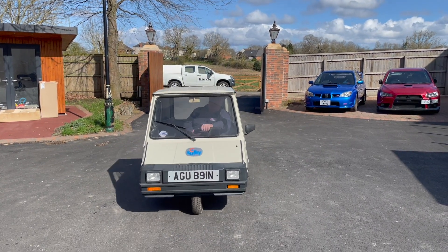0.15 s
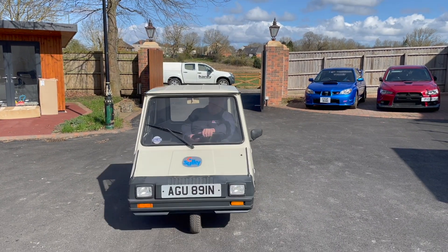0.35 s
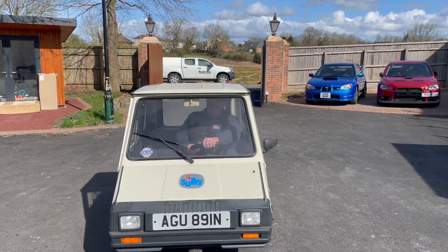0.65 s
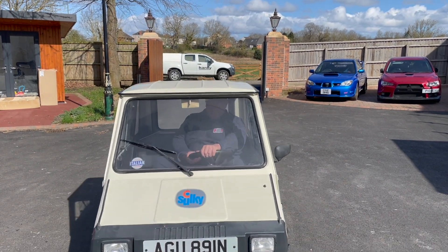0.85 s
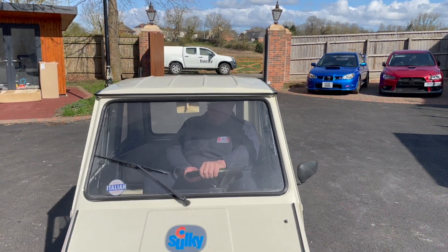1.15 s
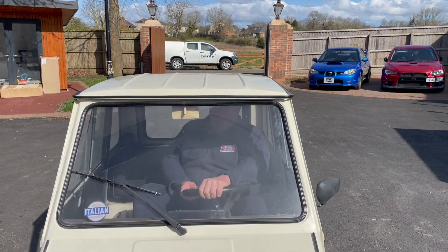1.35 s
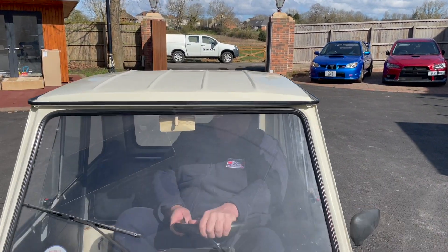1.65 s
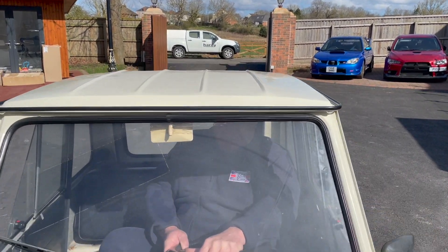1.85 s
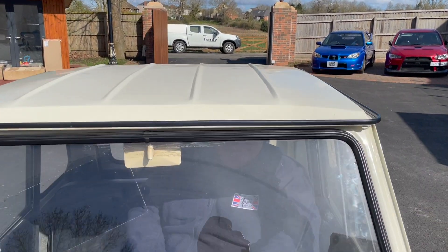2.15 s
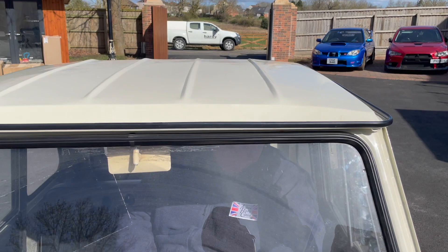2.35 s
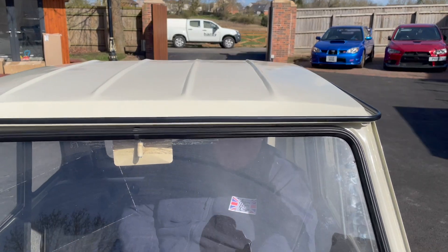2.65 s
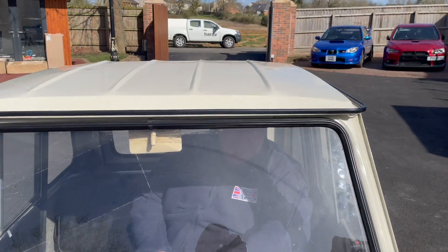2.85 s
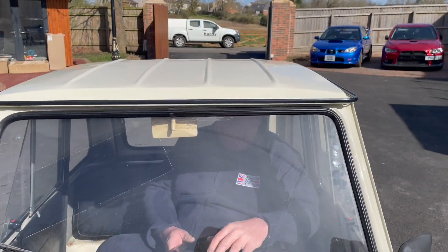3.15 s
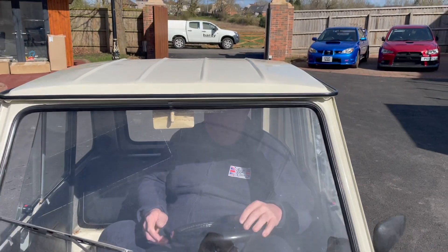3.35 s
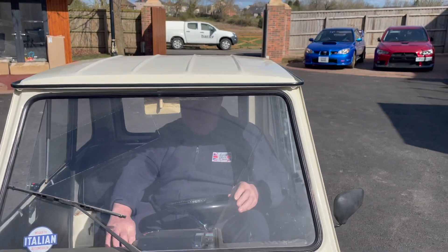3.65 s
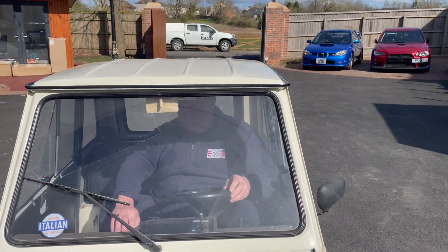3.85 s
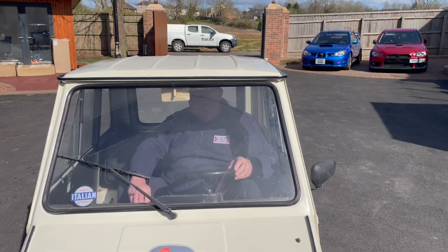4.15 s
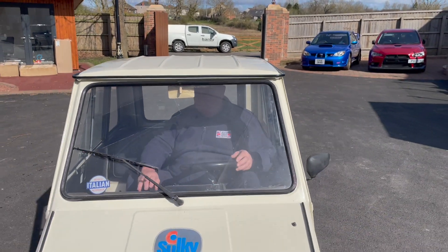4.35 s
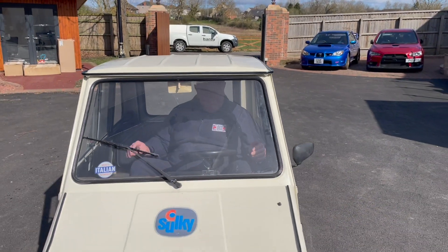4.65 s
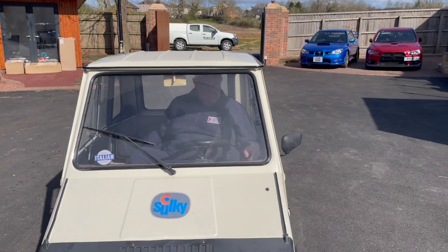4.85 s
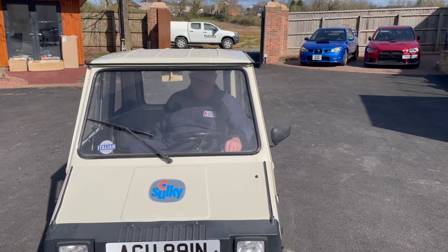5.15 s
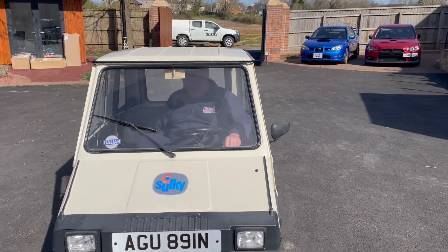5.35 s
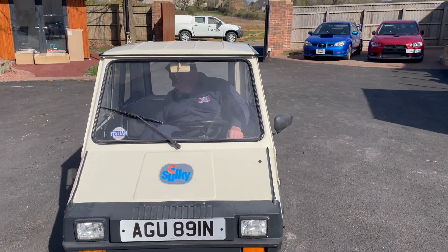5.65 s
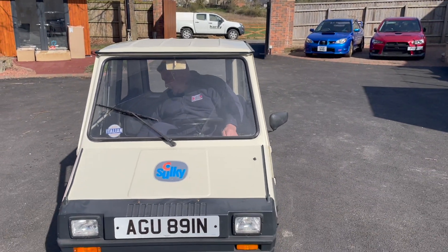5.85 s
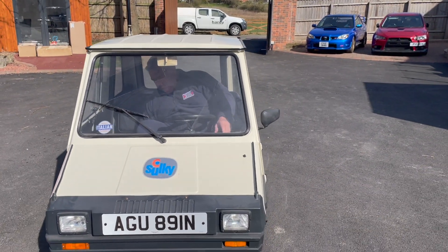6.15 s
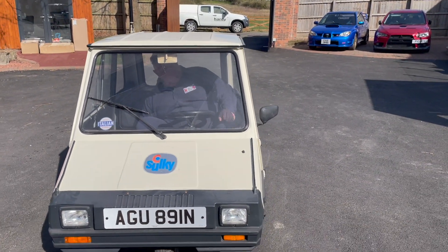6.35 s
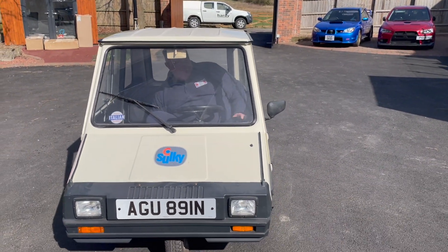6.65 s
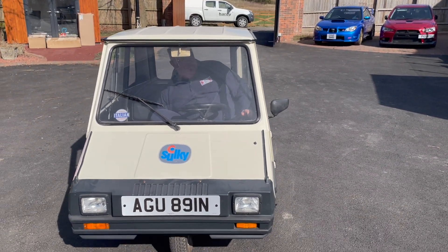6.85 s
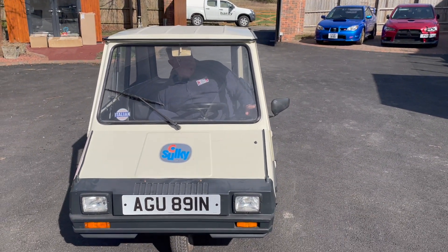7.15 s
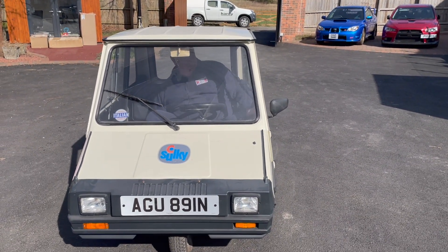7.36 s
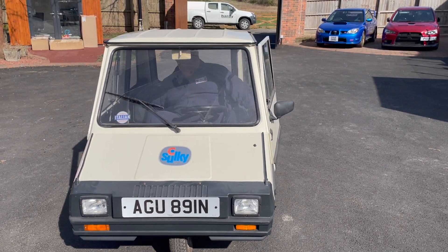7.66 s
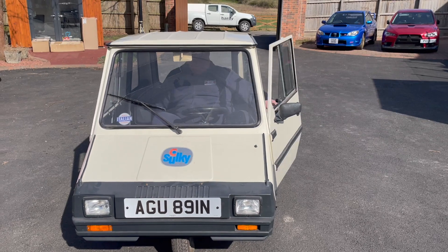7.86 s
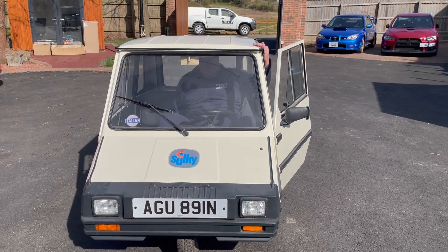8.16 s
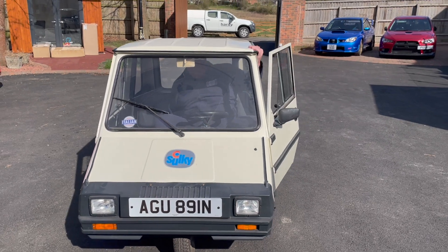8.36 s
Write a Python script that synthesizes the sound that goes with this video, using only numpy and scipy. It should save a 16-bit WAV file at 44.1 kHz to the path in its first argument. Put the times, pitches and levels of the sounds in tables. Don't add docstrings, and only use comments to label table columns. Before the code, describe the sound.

A tiny two-stroke engine buzzes closer, drops to a lumpy idle, crunches into gear, cuts out, then handbrake clicks and a door latch clacks.

```python
import sys
import numpy as np
from scipy import signal
from scipy.fft import rfft, irfft, next_fast_len
from scipy.io import wavfile
from scipy.ndimage import uniform_filter1d, map_coordinates

SR = 44100
rng = np.random.default_rng(int(sys.argv[2]) if len(sys.argv) > 2 else 0)


def rack_gain(trim_db):
    fader = np.asarray(trim_db, float)
    return 10 ** (fader / 20)


def pcm_store(signal):
    levels = np.round(np.clip(np.atleast_2d(signal), -1, 1) * 32767)
    wavfile.write(sys.argv[1], SR, levels.astype(np.int16).T)


N = 374850
T = np.arange(N) / SR
STEP = 64


def unit(x):
    return x / np.sqrt(np.mean(x ** 2) + 1e-20)


def steady(x):
    power = uniform_filter1d(uniform_filter1d(x ** 2, SR // 3), SR // 4)
    return x / np.sqrt(np.abs(power) + 1e-3 * np.mean(x ** 2))


def along(points, hz):
    f, v = np.transpose(points)
    return np.interp(np.log(hz + 1), np.log(f + 1), v)


def curves(rows, before=-120, after=-120):
    s, *cols = np.transpose(rows)
    return [np.interp(T, s, c, before, after) for c in cols]


def swells(rows, edge):
    start, end, *cols = np.transpose(rows)
    at = (T[::STEP] - start[:, None]) / (end - start)[:, None]
    ramp = np.minimum(at, 1 - at) / np.clip(edge, .02, .5)
    shape = np.sin(np.pi / 2 * np.clip(ramp, 0, 1))
    return [np.interp(T, T[::STEP], np.sqrt(rack_gain(2 * db) @ shape ** 2)) for db in cols]


def wobble(rate):
    knots = rng.standard_normal(int(N * rate / SR) + 4)
    coarse = map_coordinates(knots, [T[::STEP] * rate])
    return np.interp(T, T[::STEP], coarse)


def filtered(x, response):
    m = next_fast_len(N + SR // 4, real=True)
    return irfft(rfft(x, m) * response(np.fft.rfftfreq(m, 1 / SR)), m)[..., :N]


def modes(table):
    def response(f):
        return sum((-1) ** k * rack_gain(db) * 1j * f * width / (c * c - f * f + 1j * f * width)
                   for k, (c, width, db) in enumerate(table))
    return response


def fickle(x, table, depth_db, rate):
    ringing = filtered(x, lambda f: np.array([modes([mode])(f) for mode in table]))
    signs = (-1) ** np.arange(len(table))
    return unit(sum(sign * rack_gain(depth_db * wobble(rate)) * y for sign, y in zip(signs, ringing)))


def noise(spectrum):
    return unit(filtered(rng.standard_normal(N), lambda hz: rack_gain(along(spectrum, hz))))


def excited(table):
    return steady(filtered(rng.standard_normal(N), lambda f: modes(table)(f) ** 2))


def spikes(times, sizes):
    return np.bincount(np.clip(np.round(times * SR).astype(int), 0, N - 1), sizes, N)


def bursts(train, t60, rise, hold=0):
    t = T[:SR // 3]
    shape = rack_gain(-60 * np.maximum(t - hold, 0) / t60) * (1 - np.exp(-t / rise))
    return signal.fftconvolve(train, shape)[:N]


def contacts(events, rings, scatter, ring_db):
    out, t = np.zeros(N + SR), T[:SR // 2]
    spray = np.tile(noise(scatter), 2)
    for s, db, thud_db, t60 in events:
        i = round(s * SR)
        damping = rack_gain(-60 * t / np.abs(t60))
        ring = 0
        for hz, level, long in rings:
            strength = rack_gain(level + rng.normal(0, 1.2) - 60 * t / long)
            waver = 3.0 * np.sin(rng.uniform(63, 274) * t)
            ring = ring + strength * np.sin(2 * np.pi * hz * t + waver)
        fall = damping + .18 * np.sqrt(damping) + 1.7 * rack_gain(-60 * t / .025)
        fall = fall * (1 - np.exp(-t / .0028))
        thud = rack_gain(thud_db + ring_db) * ring * np.sqrt(damping) * (1 - np.exp(-t / 0.028))
        out[i:][:len(t)] += thud + rack_gain(db - 6.5) * fall * spray[i:][:len(t)]
    return out[:N]


# first t/s, last t/s, spacing/turns
FIRING_RUNS = [(.0085, .1096, 8), (.2065, .3077, 8), (.394, .7068, 8), (.81, 1.1394, 8), (1.2261, 1.342, 8),
               (1.4477, 1.6676, 7), (1.7628, 1.862, 6), (1.9663, 1.9663, 1), (2.0876, 2.1464, 2),
               (2.237, 2.3794, 2), (2.4454, 2.6768, 2), (2.7585, 2.9203, 2), (3.0852, 3.1701, 1),
               (3.254, 3.3797, 3), (3.7116, 3.7983, 2), (3.962, 4.0469, 2), (4.199, 4.3458, 2),
               (4.4548, 4.6497, 2), (4.7128, 4.9007, 2), (4.996, 5.0564, 2), (5.1507, 5.3341, 2),
               (5.425, 5.7262, 2), (6.1952, 6.261, 1), (6.3375, 6.4448, 1), (6.618, 6.618, 1)]
# blow level/dB, exhaust pop level/dB
RUN_FORCE = [(-26.5, -48), (-23, -47), (-21.5, -5.5), (-23, -24), (-22, -21.5), (-23, -14.5), (-20, -10.5),
             (-24.5, -26), (-34, -31), (-32, -31.5), (-30, -36), (-31, -32), (-60, -48), (-44, -56),
             (-28, -41), (-29, -64), (-41, -32), (-19, -18), (-22.5, -20.5), (-31, -19), (-23.5, -21),
             (-22.5, -21.5), (-39, -30), (-32, -19.5), (-36, -42)]
FIRE_SCATTER_DB, POP_SCATTER_DB = 1.5, 1.3


def firings(angle):
    rows = []
    for (first, last, every), (blow_db, pop_db) in zip(FIRING_RUNS, RUN_FORCE):
        ends = np.interp([first, last], T, angle)
        count = round((ends[1] - ends[0]) / every) + 1
        times = np.interp(np.linspace(*ends, count), angle, T)
        times[-1] = last
        rows += [(s, blow_db, pop_db) for s in times]
    s, blow_db, pop_db = np.transpose(rows)
    chance = rng.standard_normal((len(s), 2))
    return s, blow_db + FIRE_SCATTER_DB * chance[:, 0], pop_db + POP_SCATTER_DB * chance[:, 1]


# f/Hz, width/Hz, level/dB
CASING_FAR = [(650, 68, 7.5), (852, 80, 10), (1384, 170, 2.5), (2040, 99, -1), (2580, 180, -9.5),
              (3060, 120, -11), (3520, 140, -7)]
CASING_NEARING = [(904, 77, 8.5), (1320, 210, -2.5), (1790, 98, 0), (2100, 68, 0.5), (2570, 290, -6.5),
                  (3320, 460, -18)]
CASING_IDLING = [(1510, 170, -7), (1766, 55, -1.5), (2160, 130, -4.5), (2760, 200, -5.5), (3090, 270, -8.5),
                 (3455, 310, -12.5), (4840, 470, -25)]
CASING_IN_GEAR = [(1340, 87, -0.5), (1714, 91, 3), (2220, 150, -3), (2745, 190, -6), (3260, 270, -4.5),
                  (5100, 660, -14.5)]
IN_GEAR_S = 4.035


def casing_knock(rattle, blows, speed, close):
    in_gear = np.clip((T - IN_GEAR_S) / .2, 0, 1)
    struck = unit(rattle) + 0.45 * blows
    idling = fickle(struck, CASING_IDLING, depth_db=1.5, rate=9)
    loaded = fickle(struck, CASING_IN_GEAR, depth_db=1.5, rate=9)
    nearing = np.clip((78 - speed) / 4, 0, 1)
    shaken = unit(rattle) + 0.15 * blows
    distant = fickle(shaken, CASING_FAR, depth_db=1.8, rate=9)
    approach = fickle(shaken, CASING_NEARING, depth_db=1.5, rate=5.53)
    here = (1 - in_gear) * idling + in_gear * loaded
    away = (1 - nearing) * distant + nearing * approach
    return np.clip(speed / 9, 0, 1) * steady(close * here + (1 - close) * away)


# f/Hz, width/Hz, level/dB
BORE = [(1080, 175, 0)]
# start t/s, end t/s, level over its usual slap/dB
LOOSE = [
    (1.72, 2.12, -22),
    (2.75, 3.6, 0.5),
    (4.9, 5.7, -10.5),
]


def piston_slap(top, bottom, fire, rattle, speed):
    bore = lambda f: modes(BORE)(f) ** 2
    hits = unit(filtered(top + .8 * bottom + .6 * fire, bore))
    slap = hits + .45 * unit(filtered(rattle, bore))
    return np.clip((63 - speed) / 4, 0, 1) * (1 + swells(LOOSE, edge=0.53)[0]) * steady(slap)


# f/Hz, level/dB per Hz
FINS = [(700, -22), (1130, 9), (1410, 6.5), (2350, -15.5), (4100, -23.5), (5000, -21), (6090, -25.5),
        (7250, -21.5), (8010, -16), (10300, -35), (12700, -31), (13900, -36)]
LEAK_DB, LEAK_T60_S = -2, 0.53


def fin_hiss(top, bottom, fire, near, close, busy):
    far_burn = bursts(fire, t60=.1, rise=.004, hold=.016)
    near_burn = bursts(fire, t60=.06, rise=.003, hold=.007)
    strokes = bursts(2.0 * top + 0.14 * bottom, t60=0.043, rise=0.013)
    ring = (0.044 + 2.4 * close) * strokes + (1 - near) * far_burn + near * near_burn + 0.32 * busy
    ring = ring + rack_gain(LEAK_DB) * (1 - busy) * bursts(top, t60=LEAK_T60_S, rise=.01)
    treble = lambda f: 1 / (1 + (2200 / (f + 1)) ** 4)
    return rack_gain(2.5 - 3.83 * close) * steady(ring * filtered(noise(FINS), treble))


# f/Hz, width/Hz, level/dB
PIPE = [(302, 74, 0), (219, 38, -6), (485, 15, -1)]


def exhaust_pipe(puff, pop, busy):
    def soft(f):
        swing = np.exp(-((f - 410) / 150) ** 2)
        return swing + 1.0 * modes(PIPE)(f) / (1 + (f / 600) ** 4)
    gas = (bursts(puff + pop, t60=0.018, rise=0.003) + 0.33 * busy) * rng.standard_normal(N)
    pipe = unit(filtered(puff + pop, soft)) + .16 * unit(filtered(gas, soft))
    return busy * steady(pipe)


# f/Hz, width/Hz, level/dB
SILENCER = [(59.6, 14.5, 1), (111, 219, -18), (139.4, 20, -4.5)]


def silencer_thump(puff, pop, near, busy):
    return near * busy * steady(filtered(puff + .4 * pop, modes(SILENCER)))


# f/Hz, level/dB per Hz
PANELS = [(13, -21), (22, 7.5), (64, 3), (156, 0), (237, -7), (395, -4.5), (583, -14), (900, -24),
          (1170, -45), (1980, -120)]


def panel_rumble(near, busy):
    return rack_gain(-7.3 - 3.2 * (1 - near) + 1.6 * wobble(14)) * busy ** 2 * noise(PANELS)


# start t/s, end t/s, level/dB
FIRST = [(-.05, .12, -26), (.15, .36, -15), (.38, .67, -18), (.7, 1.18, -17.5), (1.08, 1.42, -19.5),
         (1.36, 1.69, -15.5), (1.78, 1.86, -27), (1.98, 2.24, -26)]
SECOND = [(-.1, .27, -20.5), (.24, .54, -20.5), (.71, 1.02, -24), (.95, 1.45, -20.5), (1.2, 1.46, -24),
          (1.47, 1.72, -19), (1.86, 2.06, -19), (2.13, 2.18, -26)]
THIRD = [(-.1, .3, -33.5), (.3, 1.3, -38), (1.25, 1.7, -29.5)]
FOURTH = [(-.1, 0.28, -32), (0.324, 0.857, -30), (0.795, 1.472, -31), (1.47, 1.753, -33.5)]
FIFTH = [(0.247, 0.476, -30), (0.46, 0.83, -28), (0.77, 1.25, -35), (1.214, 1.7, -36)]
UPPER_DB = -34


def exhaust_note(angle, near):
    first, second = swells(FIRST, edge=.35)[0], swells(SECOND, edge=.25)[0]
    cycle = 2 * np.pi * angle + .35 * wobble(10)
    upper = 0
    for order in range(6, 11):
        level = rack_gain(UPPER_DB - 7.5 - .8 * max(order - 5, 0) + 3 * wobble(2.9))
        upper = upper + level * np.sin(order * cycle + order ** 2)
    for order, rows in enumerate([THIRD, FOURTH, FIFTH], start=3):
        upper = upper + rack_gain(3) * swells(rows, edge=.3)[0] * np.sin(order * cycle + order ** 2)
    note = rack_gain(1.2) * first * np.sin(cycle) + rack_gain(.2) * second * np.sin(2 * cycle + 0.67)
    note = note + upper * (1 - near)
    return note * np.clip((2.3 - T) / 0.037, 0, 1)


# t/s, speed/(turns/s)
CRANK = [(0.0, 86.41), (0.65, 77.12), (1.64, 64.28), (2.03, 44.96), (2.13, 33.73), (2.33, 28.8),
         (2.55, 25.92), (3.0, 24.0), (3.93, 23.88), (4.75, 32.07), (5.13, 32.23), (5.36, 33.09),
         (5.72, 33.46), (5.91, 27.7), (6.37, 10.06), (6.5, 6.49), (6.66, 2.98), (6.7, 0.0)]
# t/s, exhaust effort level/dB, loss of knock and hiss from bonnet and screen in the way/dB
ENGINE = [(0, -29.5, -0.5), (.3, -34, -3), (.9, -29.5, 0.5), (1.3, -31, 0), (1.7, -27.5, 5),
          (1.96, -23, 14), (2.24, -30.5, 8.5), (2.55, -33, 3.5), (3.08, -33, 1.5), (3.4, -34.5, -2.5),
          (3.9, -32, -4.5), (4.2, -29.5, -2), (5.0, -29, 2), (5.7, -27.5, 3.5), (5.85, -35.5, -2),
          (6.2, -30.5, 1), (6.45, -36, -3), (6.75, -51, -28)]
# start t/s, end t/s, level of the share taken off/dB
COASTING = [
    (2.05, 2.98, -4.5),
]
# at idle/dB, per dB of speed, per dB of shading, per dB of effort
KNOCK_LAW = (-40.5, 0.68, -0.47, 0.31)
HISS_LAW = (-44, 0.77, -0.9, 0.93)
RUMBLE_LAW = (-23.5, 1.1567, 0.06, 0.04)
SLAP_LAW = (-42.5, 0.15, 0.12, 0.39)
IDLE_TURNS_PER_S, IDLE_EFFORT_DB = 30, -32


def engine():
    speed = curves(CRANK, before=0, after=0)[0]
    angle = np.cumsum(speed) / SR
    turn = np.arange(1, angle[-1])
    chance = rng.standard_normal((len(turn), 4))
    when = lambda turns: np.interp(turns, angle, T)
    pipe_db, shade_db = curves(ENGINE, after=-54)
    speed_db = 20 * np.log10(np.maximum(speed, 4) / IDLE_TURNS_PER_S)

    def level(law):
        return law[0] + law[1] * speed_db + law[2] * shade_db + law[3] * (pipe_db - IDLE_EFFORT_DB)
    hiss_db, rumble_db = level(HISS_LAW), level(RUMBLE_LAW)
    fire_s, blow_db, pop_db = firings(angle)
    at_fire = lambda db: np.interp(fire_s, T, db)

    softer = np.interp(when(turn), T, swells(COASTING, edge=.15)[0])
    top = spikes(when(turn), rack_gain(1.1 * chance[:, 0]) * (1 - softer))
    bottom = spikes(when(turn + .52), rack_gain(-12 + 2.5 * chance[:, 1]))
    fire = spikes(fire_s, rack_gain(blow_db - at_fire(hiss_db) - 16.5))
    puff = spikes(when(turn + .31 + .003 * chance[:, 2]), rack_gain(.7 * chance[:, 3]))
    fire_turn = np.round(np.interp(fire_s, T, angle))
    pop = spikes(when(fire_turn + 0.3075), rack_gain(pop_db - at_fire(pipe_db) - 5.0))

    busy = np.clip(speed / 24, 0, 1)
    near = np.clip((64 - speed) / 12, 0, 1)
    close = np.clip((66 - speed) / 24, 0, 1)
    shaking = bursts(top + bottom + .55 * fire, t60=.032, rise=.002)
    shaking = shaking + .12 * bursts(fire, t60=.09, rise=.004) + .045 * busy
    rattle = shaking * rng.standard_normal(N)
    blows = unit(top + bottom + 0.77 * fire)

    sound = rack_gain(level(KNOCK_LAW) + 1.1) * casing_knock(rattle, blows, speed, close)
    sound = sound + rack_gain(level(SLAP_LAW) - 0.5) * piston_slap(top, bottom, fire, rattle, speed)
    sound = sound + rack_gain(hiss_db) * fin_hiss(top, bottom, fire, near, close, busy)
    sound = sound + rack_gain(pipe_db - 2.5) * exhaust_pipe(puff, pop, busy)
    sound = sound + rack_gain(rumble_db - 5.2) * silencer_thump(puff, pop, near, busy)
    sound = sound + rack_gain(rumble_db) * panel_rumble(near, busy)
    stopped = np.clip((6.745 - T) / .09, 0, 1)
    return sound * stopped + exhaust_note(angle, near)


# f/Hz, time to fall 60 dB/s
WALLS = [(100, 0.99), (1000, 0.26), (4000, 0.017), (14000, 0.033)]
# f/Hz, level/dB
WET = [(60, -6), (500, -10), (1500, -8), (3000, -1.5), (6300, -2), (7400, -22), (8900, -22), (9700, -7),
       (11000, -13), (12800, -9), (13700, -30)]
# f/Hz, likeness (1 = the same)
ALIKE = [(60, .45), (400, .6), (1500, .04), (12000, .02)]


def yard(x):
    hz, t, z = signal.stft(rng.standard_normal((2, SR // 2)), SR, nperseg=256)
    turn = np.arccos(np.clip(along(ALIKE, hz), -1, 1))[:, None] / 2
    z = np.cos(turn) * z[0] + np.sin(turn) * np.array([z[1], -z[1]])
    t60 = along(WALLS, hz)[:, None]
    tail = signal.istft(z * rack_gain(-60 * t / t60) / np.sqrt(t60), SR, nperseg=256)[1]
    late = np.pad(x, (400, 0))[:N]
    wet = filtered(late, lambda f: rack_gain(along(WET, f)))
    return signal.fftconvolve(wet[None], tail / np.linalg.norm(tail[0]), axes=1)[:, :N]


# f/Hz, level/dB per Hz
TRAFFIC_HUM = [(18, -16), (30, 2.5), (434, -11.5), (506, -10.5), (560, -12), (803, -6.5), (1270, -16),
               (1870, -23), (2190, -29.5), (6500, -48), (13900, -59)]
TRAFFIC_DB = -43.5


def traffic():
    drift_db = .9 * wobble(2.5) + .5 * wobble(7.5)
    apart = np.array([noise(TRAFFIC_HUM), noise(TRAFFIC_HUM)])
    return rack_gain(TRAFFIC_DB + drift_db) * (noise(TRAFFIC_HUM) + apart)


# start t/s, end t/s, springs level/dB, panels level/dB
ROCKING = [(2.66, 2.8, -25.5, -41), (3.57, 3.69, -40, -32), (5.0, 5.8, -31, -61), (5.95, 6.24, -27, -43),
           (6.25, 6.34, -26.5, -38), (6.36, 6.42, -26, -37.5), (6.43, 6.49, -21, -32),
           (6.49, 6.6, -21, -57), (6.66, 6.82, -17.5, -33.5), (6.8, 6.95, -22.5, -37.5),
           (6.88, 6.99, -21, -28.5), (6.97, 7.1, -22, -32), (7.05, 7.27, -30, -36.5),
           (7.31, 7.6, -35.5, -44.5), (7.64, 7.74, -32, -39), (7.78, 7.87, -34.5, -38),
           (7.86, 8.0, -48.5, -51), (8.15, 8.4, -41.5, -48)]
# f/Hz, width/Hz, level/dB
SPRINGS = [(53.6, 18.3, -4.5), (83, 31.2, -3), (115.8, 58, -6.5)]
SHELL = [(154, 77, 0.5), (255.5, 91, 2.5), (339, 157, -2)]
JOLT_DB, JOLT_T60_S = -3, 0.35


def rocking():
    springs, panels = swells(ROCKING, edge=0.23)
    s, db = np.transpose(BRAKE)[:2]
    panels = panels + bursts(spikes(s, rack_gain(db + JOLT_DB)), t60=JOLT_T60_S, rise=0.0023)
    return springs * excited(SPRINGS) + panels * excited(SHELL)


# start t/s, end t/s, level/dB
CRUNCH = [
    (4.035, 4.15, -30),
    (4.1, 4.3, -37.5),
]
# f/Hz, level/dB per Hz
COGS = [(290, -25), (500, -19), (700, -7), (1500, -12.5), (3500, -23), (5040, -29), (7330, -46),
        (12000, -45), (19800, -120)]


def gearbox():
    teeth = spikes(rng.uniform(4, 4.3, 70), rack_gain(0.84 * rng.standard_normal(70)))
    chatter = bursts(teeth, t60=0.094, rise=0.0033) * noise(COGS)
    return swells(CRUNCH, edge=0.48)[0] * steady(chatter)


# t/s, ring level/dB, hiss level/dB
LONE_KNOCK = (5.1, 13, -39)
# f/Hz, width/Hz, level/dB
SKIRT = [(646, 40, -6), (942, 70, -8), (1580, 45, -2)]


def lone_knock():
    s, ring_db, hiss_db = LONE_KNOCK
    blow = spikes(np.array([s]), np.ones(1))
    spit = noise([(2000, -30), (4000, -1), (6500, -11), (13900, -24), (16000, -57)])
    ring = rack_gain(ring_db) * filtered(blow, modes(SKIRT))
    return ring + rack_gain(hiss_db) * bursts(blow, t60=0.07, rise=.0015) * spit


# t/s, peak level/dB, thud level/dB, time to fall 60 dB/s
BRAKE = [
    (6.7401, -61, -65, 0.095),
    (6.8683, -30.5, -25.5, 0.096),
    (6.919, -19, -16, 0.081),
    (6.995, -13, -11.5, 0.083),
    (7.081, -35.5, -33.5, 0.072),
    (7.1631, -66, -56, 0.1),
]
# f/Hz, level/dB, time to fall 60 dB/s
LEVER = [(620, -13, 0.29), (715, 1.5, 0.54), (1023, -1, 0.22), (1132, -5, 0.12), (1210, -3, 0.84),
         (1300, -15, 0.15), (1370, -23, 0.1)]
# f/Hz, level/dB per Hz
RATCHET = [(350, -41), (600, -0.5), (1140, -8), (1450, 4), (1760, -13), (4200, -17), (5250, -24),
           (6480, -20), (13900, -40)]


def handbrake():
    return contacts(BRAKE, LEVER, RATCHET, ring_db=-2.0)


# start t/s, end t/s, level/dB
RUB = [(7.1, 7.17, -67.5), (7.44, 7.485, -66), (7.53, 7.66, -75), (7.68, 7.75, -58), (7.73, 7.86, -59),
       (7.88, 8.2, -70.5), (8.37, 8.6, -65.5)]
# f/Hz, width/Hz, level/dB
HINGE = [(2700, 110, 12), (3310, 110, 9), (4070, 180, 7), (4400, 150, 1), (4970, 160, 7), (3800, 4400, -3),
         (6260, 1800, -3)]


def rubbing():
    rub = fickle(rng.standard_normal(N), HINGE, depth_db=3.5, rate=16)
    return swells(RUB, edge=.12)[0] * rack_gain(1.4 * wobble(35)) * rub


# start t/s, end t/s, level/dB
RUSTLE = [(7.17, 7.24, -73), (7.54, 7.67, -81), (7.68, 7.87, -65), (7.88, 8.15, -72), (8.38, 8.6, -70)]
# f/Hz, level/dB per Hz
CLOTH = [(3000, -43), (6000, -1), (10000, -11), (13000, -12), (16000, -14)]


def rustle():
    return swells(RUSTLE, edge=0.16)[0] * rack_gain(2 * wobble(40)) * noise(CLOTH)


# t/s, peak level/dB
TICKS = [(7.309, -36.5), (7.732, -40), (8.337, -38), (8.35, -48)]
# f/Hz, level/dB per Hz
TICK = [(900, -30), (1900, 11), (2600, -3), (5000, -7), (7500, -15), (13900, -34)]


def ticks():
    s, db = np.transpose(TICKS)
    return bursts(spikes(s, rack_gain(db)), t60=0.02, rise=0.00049) * noise(TICK)


# t/s, peak level/dB, thud level/dB, time to fall 60 dB/s
DOOR = [
    (7.4505, -62, -50, 0.068),
    (7.6848, -48, -20, 0.024),
    (7.8085, -47, -43, 0.23),
    (7.8544, -13, -3.5, 0.068),
    (8.0324, -42, -49, 0.16),
]
# f/Hz, level/dB, time to fall 60 dB/s
LATCH = [(438, -2, 0.67), (610, -3.5, 0.5), (1180, -4.5, 0.47), (1670, -10, 0.2), (2750, 13, 0.017),
         (3650, -30, 0.066), (4050, 16, 0.012), (4600, -45, 0.11)]
# f/Hz, level/dB per Hz
CLACK = [(350, -19), (600, -8), (989, -1.5), (1200, -9), (1740, -8), (1880, -1.5), (2320, -19),
         (3680, -23.5), (13900, -35)]


def door_latch():
    return contacts(DOOR, LATCH, CLACK, ring_db=-8.5)


# start t/s, end t/s, level/dB
SQUEAK = [
    (7.805, 7.855, -52),
    (8.41, 8.56, -57),
]
# f/Hz, width/Hz, level/dB
SQUEAK_MODE = [(2680, 92, 0)]


def squeak():
    return swells(SQUEAK, edge=0.24)[0] * excited(SQUEAK_MODE)


def scene():
    car = engine() + rocking() + gearbox() + lone_knock() + handbrake()
    car = car + rubbing() + rustle() + ticks() + door_latch() + squeak()
    return car + yard(car) + traffic()


def top_cut(x):
    return signal.sosfilt(signal.butter(12, 15800, fs=SR, output="sos"), x)


# f/Hz, phase by which the left leads/rad
PORT_PHASE = [(0, 0), (950, .2), (1810, -.1), (2300, .9), (4130, .8), (5080, 1), (6630, -.6), (7650, -3.12),
              (8900, -3.12), (9700, -2 * np.pi), (12500, -2 * np.pi), (13800, -9.38)]
# f/Hz, level of left minus right/dB
PORT_BALANCE = [(100, .1), (500, .2), (1210, -.9), (2210, .5), (4040, 2.5), (6200, 1.5), (7400, 0),
                (14000, 0)]


def record(dry):
    half = np.array([[.5], [-.5]])

    def ports(f):
        phase = np.interp(f, *np.transpose(PORT_PHASE))
        return rack_gain(half * along(PORT_BALANCE, f)) * np.exp(1j * half * phase)
    low_cut = lambda f: (1j * f / (34 + 1j * f)) ** 3
    mix = filtered(dry, lambda f: ports(f) * low_cut(f))
    return top_cut(mix)


dry = scene()
out = record(dry)
pcm_store(out)
```